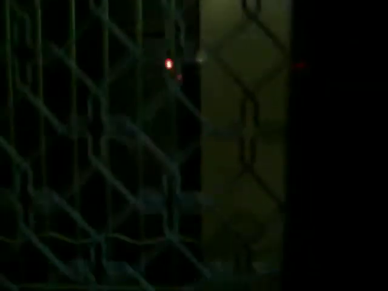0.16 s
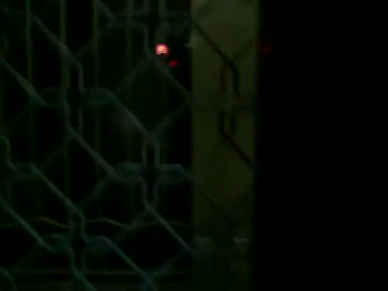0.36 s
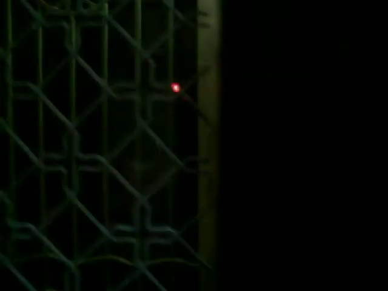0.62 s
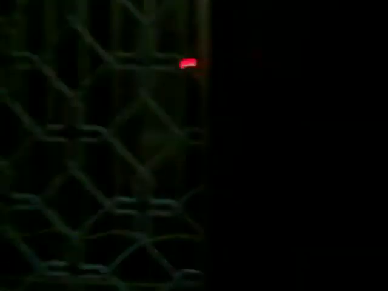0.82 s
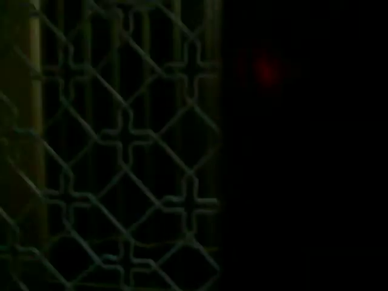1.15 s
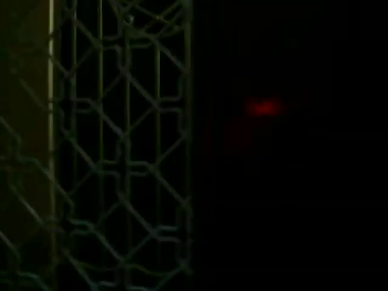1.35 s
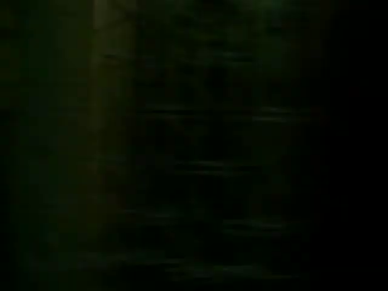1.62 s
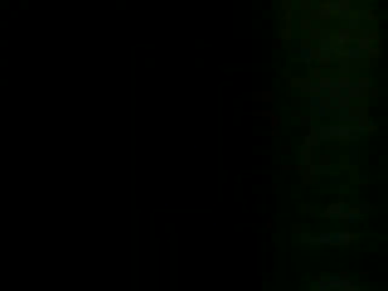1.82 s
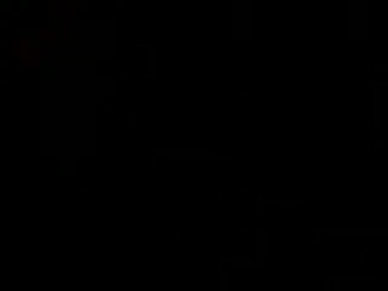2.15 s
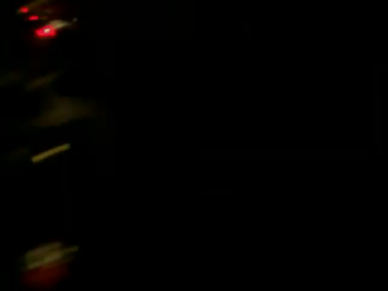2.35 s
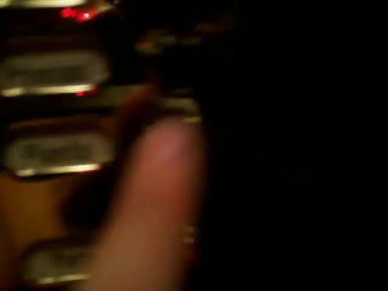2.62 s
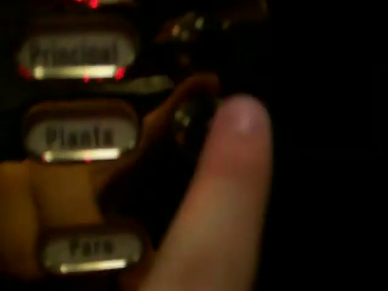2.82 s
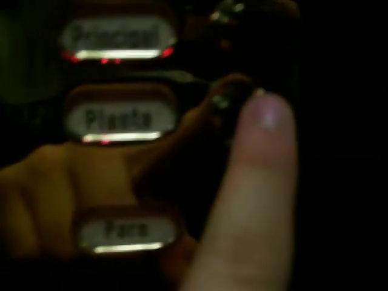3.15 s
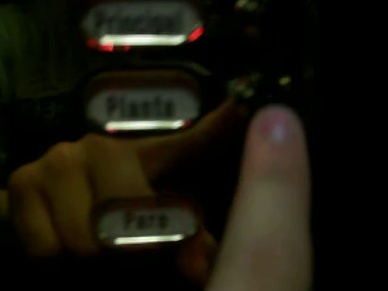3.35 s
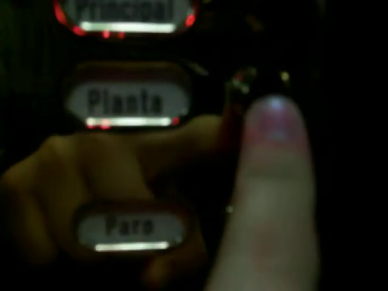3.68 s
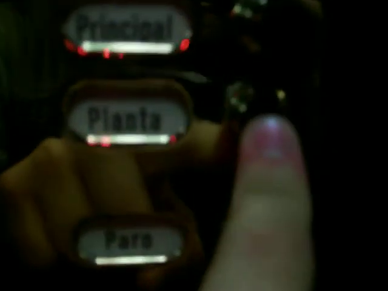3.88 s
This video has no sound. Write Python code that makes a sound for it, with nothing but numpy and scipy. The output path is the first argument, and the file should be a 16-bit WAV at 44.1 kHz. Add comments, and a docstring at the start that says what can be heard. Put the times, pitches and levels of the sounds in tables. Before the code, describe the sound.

Old elevator door rumbling shut with a steel jangle, then thumps, button clicks and a clunk.

```python
"""A rumble, a steel jangle and a deep boom, heard inside an old elevator's small car as its door runs shut. The
door shakes the car and the gate, its rollers groan and the car settles. Dull thumps on the floor and rustles of
clothing follow, then a push button clicks and a contactor clunks, shaking the car. A dull little microphone
adds hiss, and a faint electrical hum lies beneath. Early on come a few sharp, glitch-like clicks; the loudest
is hard-clipped, giving it a bright, harsh edge."""
import sys
import numpy as np
from scipy.fft import rfft, irfft, next_fast_len
from scipy.io import wavfile
from scipy.ndimage import uniform_filter1d, map_coordinates

SR = 44100
rng = np.random.default_rng(int(sys.argv[2]) if len(sys.argv) > 2 else 0)


def persist_wave(psi):
    """Save psi, clipped to +-1, as 16-bit WAV."""
    counts = np.round(np.clip(psi, -1, 1) * 32767).astype(np.int16)
    wavfile.write(sys.argv[1], SR, np.atleast_2d(counts).T)


N = 176400
CRACK_T60_S = .011
# Microphone treble roll-off. Each row: frequency in Hz, gain in dB.
MIC_RESPONSE = [(5200, -0.5), (5600, -6), (5900, -16), (6200, -36), (6600, -89)]


def amp(db):
    """Decibels to gain."""
    return 10 ** (np.asarray(db) / 20)


def unit(x):
    """Scale to rms 1."""
    return x / np.sqrt(np.mean(x ** 2) + 1e-20)


def since(start_s):
    """Seconds since the start, zero before."""
    return np.maximum(np.arange(N) / SR - start_s, 0)


def curve(points):
    """Gain per sample through (s, dB) points."""
    return amp(np.interp(since(0), *np.transpose(points)))


def colour(points, tilt_db_oct=0):
    """Tilted response through (Hz, dB) points."""
    knots_hz, db = np.transpose(points)
    tilted_db = db + tilt_db_oct * np.log2(knots_hz)
    return lambda hz: amp(np.interp(np.log(hz + 1), np.log(knots_hz + 1), tilted_db))


def body(modes):
    """Response of (Hz, width Hz, dB) resonances, alternating in sign."""
    return lambda f: sum((-1) ** k * amp(db) * 1j * f * width / (hz * hz - f * f + 1j * f * width)
                         for k, (hz, width, db) in enumerate(modes))


def filtered(x, response):
    """Apply a frequency response."""
    size = next_fast_len(N + SR // 2)
    return irfft(rfft(x, size) * response(np.fft.rfftfreq(size, 1 / SR)), size)[:N]


def wobble(knots_per_s):
    """Smooth random curve."""
    coarse_s = np.linspace(0, N / SR, N // 20)
    spline = map_coordinates(rng.standard_normal(N // 100), [coarse_s * knots_per_s], mode="mirror")
    return np.interp(since(0), coarse_s, spline)


def noise(response, grain_db=0):
    """Coloured noise of rms 1, optionally grainy."""
    grains = amp(grain_db * wobble(300))
    return unit(filtered(rng.standard_normal(N) * grains, response))


def even(x, samples):
    """Divide by the running rms to remove chance swells."""
    return x / np.sqrt(np.abs(uniform_filter1d(x * x, samples)) + 1e-6)


def blow(start_s, rise_s, t60_s):
    """Envelope: linear rise, exponential decay."""
    return np.minimum(since(start_s) / rise_s, 1) * 1000. ** (-since(start_s + rise_s) / t60_s)


def background():
    """Wavering electrical hum and microphone hiss."""
    # Each row: frequency in Hz, level in dB.
    hum_lines = [(50, -43.5), (101, -44.5), (277, -54)]
    hiss_spectrum = [(30, -4.5), (100, -4), (170, -9), (300, -11.5), (500, -12.5), (800, -14.5),
                     (1300, -19), (2500, -23), (5000, -27), (6000, -32)]
    hum = np.zeros(N)
    for hz, db in hum_lines:
        peak = np.sqrt(2) * amp(db + 4.5 * wobble(9))
        hum += peak * np.sin(2 * np.pi * hz * since(0) + .39 * wobble(6.6))
    return hum + amp(-41.5) * noise(colour(hiss_spectrum))


def clothing():
    """Short grainy strokes of cloth, each with a high swish."""
    # Each row: peak time in s, level in dB, rise in s, fall in s, tilt in dB/octave, relative swish in dB.
    strokes = [(.88, -42, .04, 0.044, 1.5, -14.5), (1.02, -40.5, 0.033, 0.081, -2, -8),
               (1.24, -42.5, .03, 0.061, -0.5, -4), (1.775, -44.5, 0.032, 0.035, -5.5, 4.5),
               (1.83, -46, .03, 0.07, -2.5, -7.5), (2.02, -38.5, 0.0066, 0.023, -2, -8),
               (2.12, -47, 0.09, 0.12, -0.5, -8.5), (2.27, -38.5, 0.035, 0.058, -0.5, -3),
               (2.42, -48, .08, 0.21, -2.5, -13), (3.05, -45.5, 0.031, 0.057, -12.5, -24),
               (3.37, -41.5, 0.027, .02, -11.5, -25)]
    # Each row: frequency in Hz, level in dB.
    spectrum = [(200, -11.5), (500, -5.5), (780, 13), (1200, 1.5), (2000, 3.5), (3000, 3), (4500, -3),
                (6000, -15.5)]
    swish_hz, swish_width_hz = 3380, 2400
    t, out = since(0), np.zeros(N)
    for peak_s, db, rise_s, fall_s, tilt_db_oct, swish_db in strokes:
        envelope = np.exp(-.5 * ((t - peak_s) / np.where(t < peak_s, rise_s, fall_s)) ** 2)
        swish = amp(swish_db) * noise(body([(swish_hz, swish_width_hz, 0)]))
        rustle = noise(colour(spectrum, tilt_db_oct), grain_db=2)
        out += amp(db) * envelope * (rustle + swish)
    return out


def glitch_clicks():
    """Sharp clicks: a few high cycles, a low pulse, a brief ring."""
    # Each row: start in s, level in dB, pitch in Hz, t60 in s, pulse in dB, ring in dB, ring pitch in Hz.
    clicks = [(0.0926, 6.5, 4490, 0.0025, -3.5, -12.5, 1400), (0.9102, -11.5, 3830, 0.0028, -26, -17, 750),
              (0.936, -10, 2384, 0.0099, -22, -18, 1540)]
    rise_s, pulse_s, ring_width_hz = .00023, .00052, 420
    out = np.zeros(N)
    for start_s, db, hz, t60_s, pulse_db, ring_db, ring_hz in clicks:
        t = since(start_s)
        gritty_tone = np.sin(2 * np.pi * hz * t) + .2 * noise(colour(MIC_RESPONSE))
        ring = even(noise(body([(ring_hz, ring_width_hz, 0)])), samples=150)
        out += amp(db) * blow(start_s, rise_s, t60_s) * gritty_tone
        out += amp(ring_db) * blow(start_s, rise_s, t60_s=.021) * ring
        out += amp(pulse_db) * t / pulse_s * np.exp(1 - t / pulse_s)
    return out


def button():
    """Each click cracks, rattles round the car, pings the spring and knocks the panel."""
    # Each row: start in s, level in dB, panel knock in dB.
    clicks = [(2.865, -41.5, -41.5), (2.891, -38, -55), (3.0621, -30.5, -28.5)]
    # Each row: frequency in Hz, level in dB.
    spectrum = [(300, -14), (700, -6), (1400, -5), (2200, -5), (2900, 5.5), (4100, 1.5), (4800, -7.5),
                (6000, -6)]
    # Each row: frequency in Hz, width in Hz, gain in dB.
    panel_modes = [(321.5, 14, 8), (440, 40, -11.5), (583, 35, 1.5), (850, 52, -10)]
    spring_hz = 4140
    out = np.zeros(N)
    for start_s, db, knock_db in clicks:
        rattle = blow(start_s, .001, t60_s=.17)
        crack = amp(6) * blow(start_s, .00025, CRACK_T60_S)
        out += amp(db) * (rattle + crack) * even(noise(colour(spectrum)), samples=150)
        spring = np.sin(2 * np.pi * spring_hz * since(start_s))
        out += amp(-44.5) * blow(start_s, .004, t60_s=.1) * spring
        panel = even(noise(body(panel_modes)), samples=500)
        out += amp(knock_db) * blow(start_s, .0033, t60_s=.3) * panel
    return out


def contactor():
    """A hard clack rings the contactor's housing and shudders the car."""
    # Each row: frequency in Hz, level in dB, t60 in s.
    housing_modes = [(196, -33, .35), (319, -34, 0.55), (646, -26.5, 0.55), (728, -24.5, 0.42),
                     (801, -19, 0.34), (951, -25.5, 0.47), (1023, -28, 0.25), (1045, -21.5, .26),
                     (1134, -29.5, 0.22)]
    # Each row: frequency in Hz, level in dB.
    spectrum = [(60, 4), (200, 8), (450, 11), (1000, 0), (1350, 1), (2000, 2), (3300, 0.5), (4000, -4.5),
                (4700, -15.5), (5600, -7.5)]
    start_s, rise_s = 3.389, .0022
    hollow_hz, hollow_width_hz, shudder_hz = 880, 380, 12
    t, ring = since(start_s), np.zeros(N)
    for hz, db, t60_s in housing_modes:
        phase = 2 * np.pi * (hz * t + rng.random()) + .61 * wobble(70)
        ring += amp(db) * blow(start_s, rise_s, t60_s) * np.sin(phase)
    band = body([(hollow_hz, hollow_width_hz, 0)])
    hollow = even(noise(lambda hz: band(hz) ** 2), samples=800)
    ring += amp(-23.5) * blow(start_s, rise_s, t60_s=.41) * hollow
    clack = amp(-19.5) * blow(start_s, rise_s, t60_s=.3)
    crack = amp(-10.5) * blow(start_s, .0006, CRACK_T60_S)
    shudder = amp(-10) * blow(start_s, .029, t60_s=.9) * np.sin(2 * np.pi * shudder_hz * t)
    return (clack + crack) * noise(colour(spectrum), grain_db=1.5) + ring + shudder


def car_ring(drive):
    """The car's resonances, each wavering on its own, weighted by a drive spectrum."""
    # Each row: frequency in Hz, relative level in dB.
    modes = [(59, -1), (98, 2), (135, 0), (163, -3), (213, -6.5), (232, -5), (276, 3.5), (325, -6.5),
             (355, -8), (392, -2), (455, -4), (500, -9), (588, -6), (660, -11), (726, -12.5)]
    waver_db, blur_rad = 2, 1.01
    out = np.zeros(N)
    for hz, db in modes:
        gain = drive(hz) * amp(db + waver_db * wobble(14))
        out += gain * np.sin(2 * np.pi * (hz * since(0) + rng.random()) + blur_rad * wobble(12))
    return unit(out)


def thumps():
    """Soft blows to door and floor ring the car."""
    # Each row: start in s, level in dB, rise in s, t60 in s, tilt in dB/octave.
    blows = [(.055, -18, .06, 0.64, 1), (1.08, -18.5, 0.016, 0.39, -3), (1.44, -20.5, 0.031, 0.32, -2.5),
             (1.721, -31.5, 0.0068, .25, 2), (1.775, -21, 0.018, 0.22, -8), (1.86, -20, 0.012, 0.34, -1.5),
             (2.069, -23, 0.016, 0.37, -0.5), (2.323, -22.5, 0.011, .24, -2), (3.395, -28, .02, .35, -4)]
    # Each row: frequency in Hz, level in dB.
    spectrum = [(30, -14), (70, -4.5), (100, -0.5), (170, -8), (380, -9.5), (550, -15), (900, -24.5),
                (2000, -36), (5000, -55)]
    out = np.zeros(N)
    for start_s, db, rise_s, t60_s, tilt_db_oct in blows:
        drive = colour(spectrum, tilt_db_oct)
        ring = amp(-2.5) * car_ring(drive)
        thud = amp(-3) * even(noise(drive), samples=2000)
        out += amp(db) * blow(start_s, rise_s, t60_s) * (ring + thud)
    return out


def gate():
    """Bursts of tiny steel contacts ring the lattice."""
    # Each row: start in s, level in dB, rise in s, t60 in s.
    jangles = [(0, -41.5, .005, 0.86), (0.141, -28, 0.0071, 0.32), (.265, -41, 0.027, 0.99),
               (.35, -43, 0.059, 1), (.915, -35, 0.011, 0.29)]
    # Each row: frequency in Hz, width in Hz, gain in dB.
    modes = [(1430, 59, 3), (1930, 46, -7), (2440, 60, 1), (3420, 53, -7.5), (3826, 50, -4.5),
             (4090, 47, -3), (4370, 60, -5), (4700, 45, -5)]
    # Each row: frequency in Hz, level in dB.
    spectrum = [(400, -32.5), (1100, -3.5), (2500, 3.5), (3200, -2.5), (4700, -3), (6000, -7)]
    ring = noise(body(modes), grain_db=2.5)
    contacts = amp(-1.5) * noise(colour(spectrum), grain_db=2.5)
    envelope = sum(amp(db) * blow(start_s, rise_s, t60_s) for start_s, db, rise_s, t60_s in jangles)
    return envelope * (ring + contacts)


def roller_groan():
    """The rollers' rough note sinks as the door slows."""
    # Each row: time in s, pitch in Hz, level in dB.
    glide = [(0, 642, -24.5), (.15, 591, -36.5), (0.379, 558.4, -30), (.56, 510, -39.5), (.69, 480, -33),
             (.82, 500, -40), (1.05, 481, -39.5), (1.35, 455, -65), (4, 454, -110)]
    times_s, hz, db = np.transpose(glide)
    t = since(0)
    phase = 2 * np.pi * np.cumsum(np.interp(t, times_s, hz)) / SR
    gain = amp(np.interp(t, times_s, db) + 2.5 * wobble(45))
    return gain * np.sin(phase + 1.2 * wobble(80))


def door_bumps():
    """The door jolts over rough spots: dull pulses that build up and let go abruptly."""
    # Each row: peak time in s, level in dB.
    jolts = [(.233, -4), (0.317, -6.5), (.486, -5.5), (.578, -12), (0.6057, -7), (0.629, -17)]
    rise_s, fall_s = .0012, .0006
    t = since(0)
    return -sum(amp(db) * np.exp(-np.abs(t - peak_s) / np.where(t < peak_s, rise_s, fall_s))
                for peak_s, db in jolts)


def door_rumble():
    """The running door shakes the car, which drones as it settles; car and shaft boom below."""
    # Each row: time in s, level in dB.
    rumble_levels = [(0, -20), (.045, -25), (.1, -14), (.19, -14.5), (.25, -21), (.4, -19.5), (.55, -28.5),
                     (.95, -29.5), (1.15, -31), (1.4, -40.5), (1.65, -47), (2.3, -35.5), (2.7, -60),
                     (4, -56)]
    drone_levels = [(0, -49.5), (.9, -33), (.98, -24.5), (1.15, -24.5), (1.32, -28), (1.42, -37),
                    (1.55, -28), (1.7, -38), (2.1, -59.5), (4, -100)]
    boom_levels = [(0, -23), (.1, -18.5), (.4, -14.5), (.6, -12), (.85, -17), (1.05, -15.5), (1.3, -16),
                   (1.7, -23), (2, -22.5), (2.2, -13.5), (2.3, -21), (2.55, -19.5), (2.75, -29.5),
                   (3.1, -25), (3.3, -34), (3.55, -24), (3.75, -33), (4, -26)]
    # Each row: frequency in Hz, level in dB.
    roll_spectrum = [(30, -14), (90, -2), (160, -4.5), (400, -10.5), (650, -12), (900, -19), (1400, -25),
                     (2500, -31.5), (5500, -40)]
    boom_spectrum = [(8, -16.5), (18, -1), (30, 4), (42, -7), (58, -7), (75, -16.5), (110, -19.5),
                     (180, -39.5), (400, -66)]
    ring = amp(-2) * car_ring(colour([(600, -8), (1200, -15), (5000, -32.5)]))
    roll = amp(-5.5) * even(noise(colour(roll_spectrum), grain_db=4), samples=4000)
    roughness = amp(.5 * wobble(40.3))
    drone = curve(drone_levels) * car_ring(colour([(165, -1), (230, -15.5), (700, -28.5)]))
    boom = curve(boom_levels) * even(noise(colour(boom_spectrum)), samples=7000)
    return curve(rumble_levels) * (ring + roll) * roughness + drone + boom


def microphone(x, top_hz=6600):
    """The microphone's narrow band."""
    return filtered(x, lambda hz: colour(MIC_RESPONSE)(hz) * (hz < top_hz))


def scene():
    """Mono mix; the loudest click is hard-clipped."""
    door = door_rumble() + roller_groan() + door_bumps()
    car = door + thumps() + gate() + clothing() + button() + contactor() + background()
    clipped_clicks = np.clip(microphone(glitch_clicks()), -.52, .52)
    return (microphone(car) + clipped_clicks)[None]


def record(dry):
    """Shape the clipped click's bright edge and cut everything above the band limit."""
    # Each row: frequency in Hz, gain in dB.
    treble = [(6000, 0), (7500, -10), (11000, -4.5), (14000, 5), (17000, -25), (19000, -80)]
    top_hz = 19000
    return filtered(dry[0], lambda hz: colour(treble)(hz) * (hz < top_hz))[None]


dry = scene()
out = record(dry)
persist_wave(out)
```